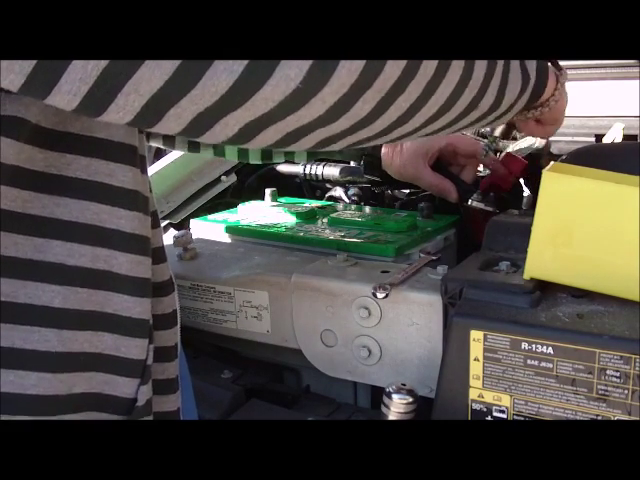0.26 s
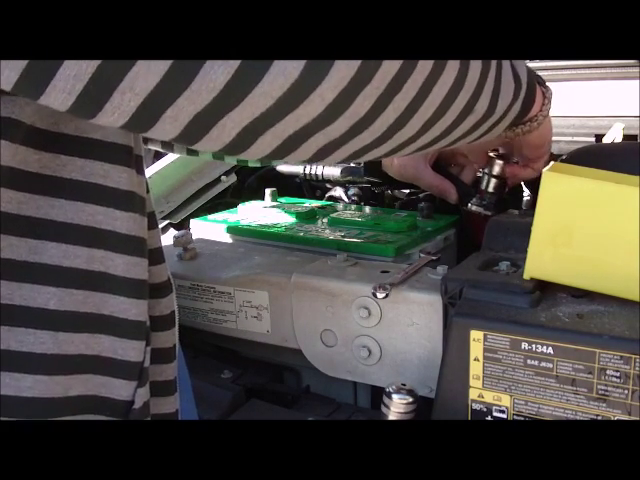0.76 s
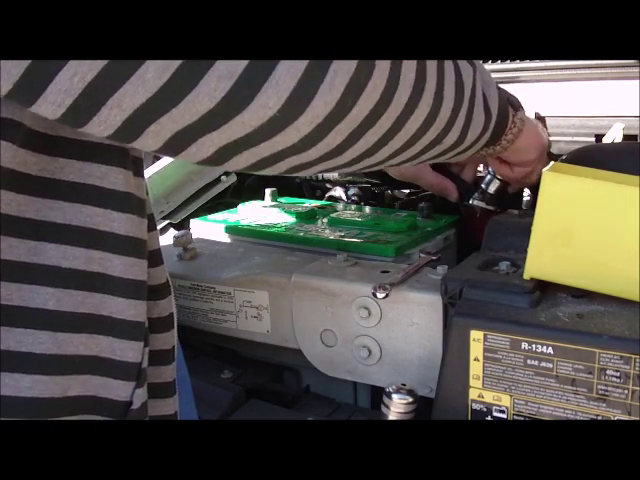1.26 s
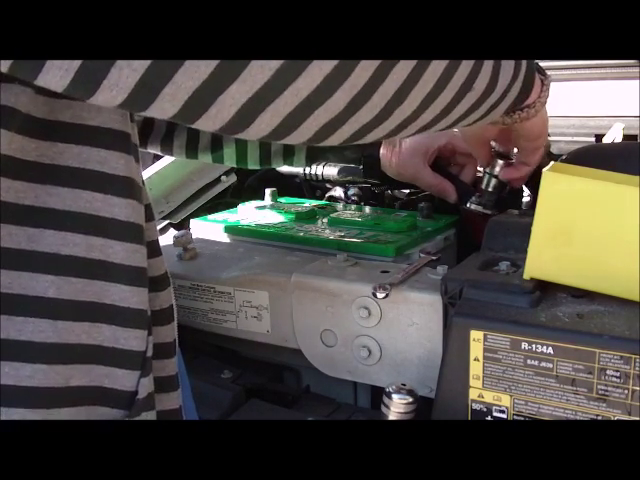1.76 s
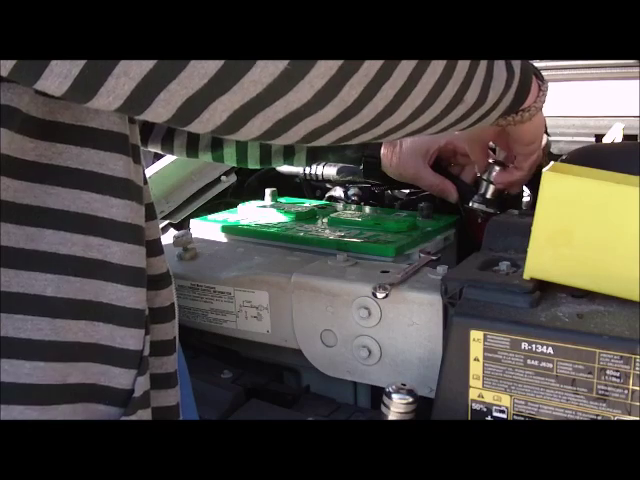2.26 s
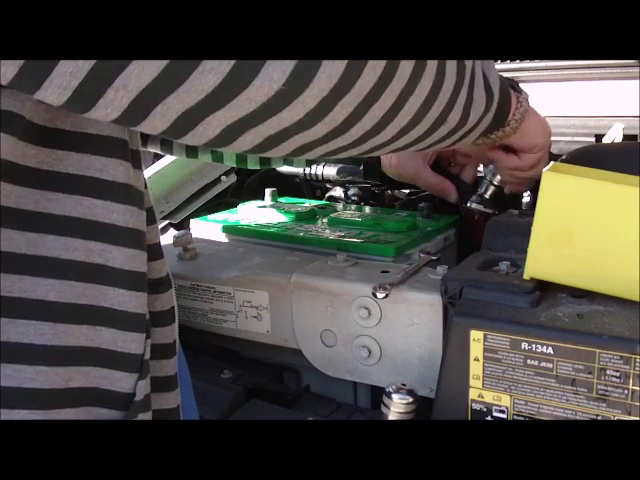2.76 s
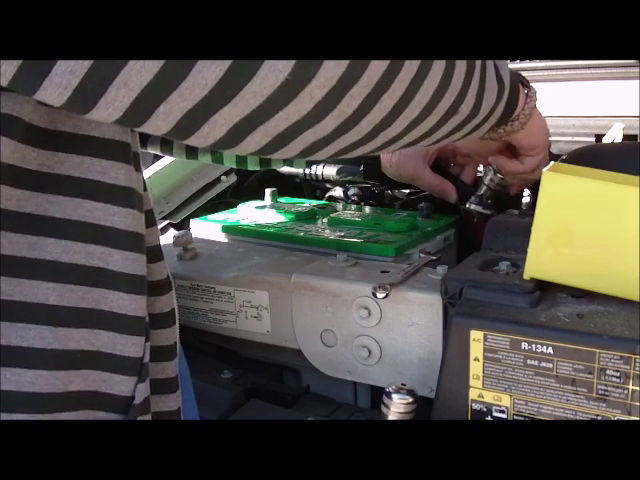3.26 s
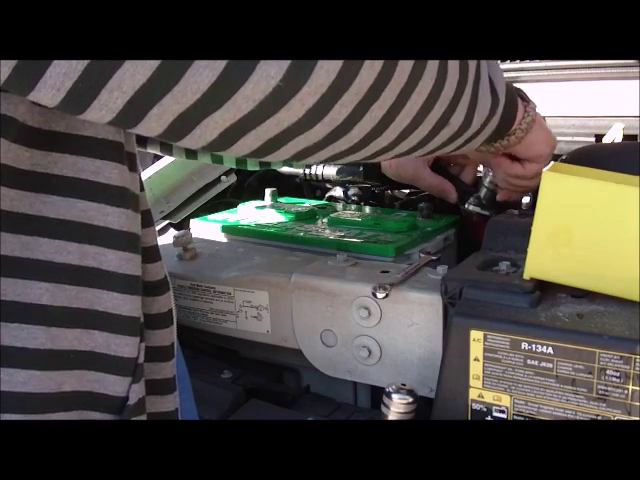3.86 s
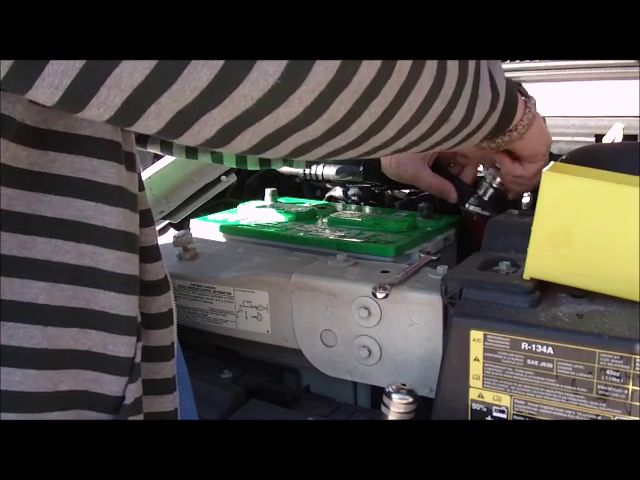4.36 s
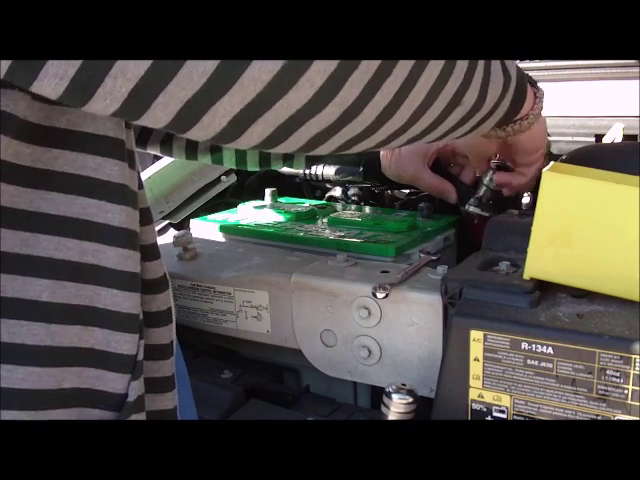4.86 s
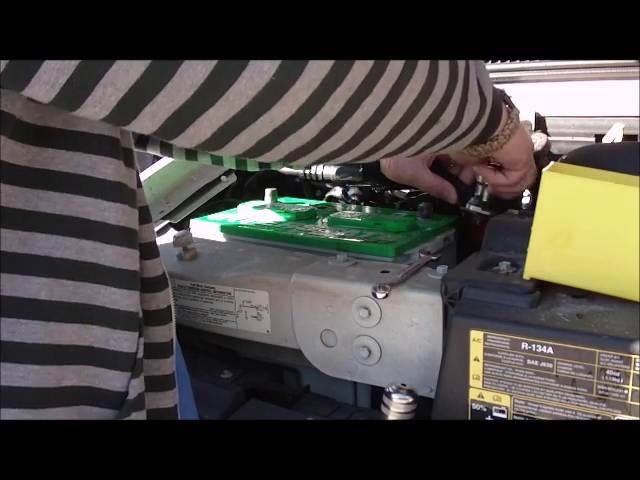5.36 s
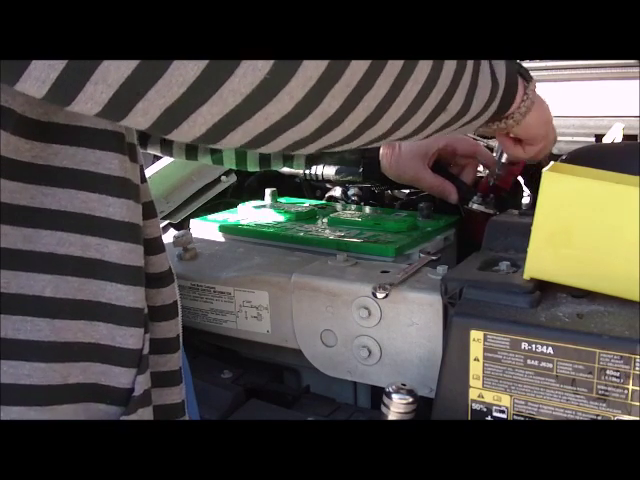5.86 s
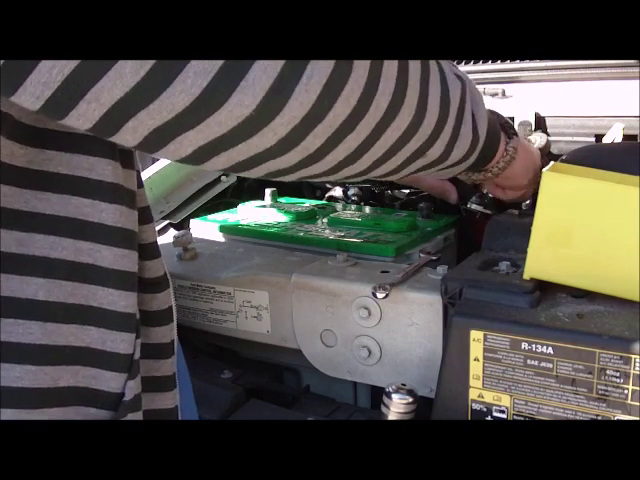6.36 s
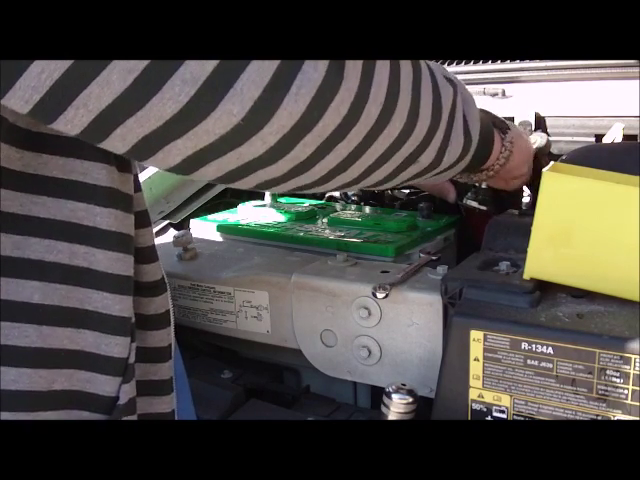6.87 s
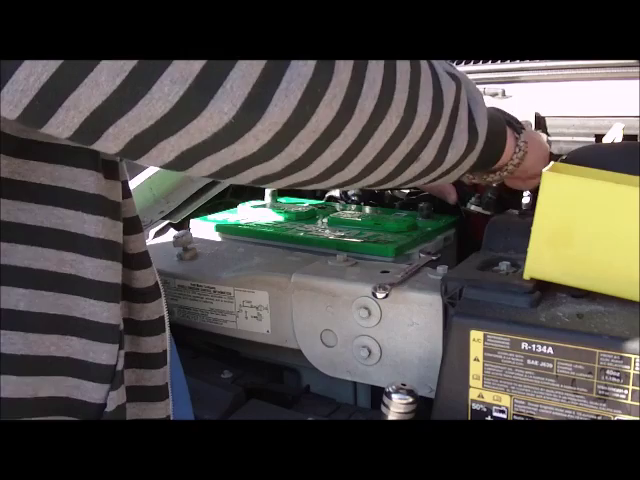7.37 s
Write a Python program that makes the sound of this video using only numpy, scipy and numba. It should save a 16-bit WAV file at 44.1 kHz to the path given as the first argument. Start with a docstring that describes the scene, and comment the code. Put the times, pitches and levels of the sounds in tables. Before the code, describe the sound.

In an open garage, a cup-shaped wire brush is worked by hand on a battery terminal, heard close and nearly mono. Quick gritty scratches open the first 0.25 seconds, then a near pause until 0.65. At 0.9 a sharp steel clack rings, the loudest knock, followed by raspy twists and smaller metallic ticks from 1.4 to 2.0. Uneven strokes continue, with a longer scrape at 2.5 and a softer one at 3.1. The firmest, brightest grinding comes from 3.7 to 5.1, full of crackling bristle catches, with a short hard rasp at 5.6. After a brief gap, lighter, hollower strokes run from 6.0 to 7.0. Another lull ends with a scrape and high clink near 7.45. A wavering low hum and distant traffic rumble lie beneath, and a faint hollow howl swells at the end.

```python
"""In an open garage, a cup-shaped wire brush is twisted to and fro on a battery terminal.
Bristles slip over the metal in clumps of tiny clicks; they ring the steel shell and the air in the cup,
whose pitch rises as the cup lifts. Steel knocks crack and ring, and nearby metal throws back short echoes.
A wavering mains hum and far traffic lie below, and a hollow howl swells at the end."""
import sys
import numpy as np
from scipy import signal
from scipy.fft import rfft, irfft
from scipy.io import wavfile
from numba import njit

SR = 44100
rng = np.random.default_rng(int(sys.argv[2]) if len(sys.argv) > 2 else 0)


def gain_from_db(level_db):
    """Turn a decibel level (scalar or array-like) into a linear amplitude factor."""
    decades = np.asarray(level_db, float) / 20
    return 10 ** decades


def unload_wav(signal):
    """Save mono or channel-first audio to the path in sys.argv[1] as 16-bit WAV at rate SR, clipped to [-1, 1]."""
    wavfile.write(
        sys.argv[1],
        SR,
        np.round(np.clip(np.atleast_2d(signal).T, -1, 1) * 32767).astype(np.int16),
    )


N = 335601  # length in samples


def rms_one(x):
    """Scale to rms 1."""
    return x / np.sqrt(np.mean(x ** 2) + 1e-20)


def in_time(rows):
    """Draw straight lines between the rows of a table: each column gets one value a sample."""
    seconds, *columns = np.transpose(rows)
    return [np.interp(np.arange(N) / SR, seconds, column) for column in columns]


def colour(x, spectrum):
    """Shape by a spectrum; white noise of rms 1 keeps about rms 1."""
    hz, db = np.transpose(spectrum)
    grid = np.arange(N // 2 + 1) * SR / N + 1   # the 1 keeps the logarithm finite
    gain = gain_from_db(np.interp(np.log(grid), np.log(hz), db, left=-90, right=-90))
    return irfft(rfft(x) * rms_one(gain), N)


def drift(rate_hz):
    """Slow random wandering of spread 1: noise through two equal low-pass filters."""
    r = np.exp(-2 * np.pi * rate_hz / SR)
    white = rng.standard_normal(N + SR)
    settled = signal.lfilter([1], [1, -2 * r, r * r], white)[SR:]
    return rms_one(settled)


def resonate(x, modes):
    """Resonances (Hz, width Hz, dB) side by side, with alternating signs."""
    out = 0
    for k, (hz, width_hz, db) in enumerate(modes):
        r = np.exp(-np.pi * width_hz / SR)
        top = gain_from_db(db) * (-1) ** k * (1 - r * r) / 2
        out = out + signal.lfilter([top, 0, -top], [1, -2 * r * np.cos(2 * np.pi * hz / SR), r * r], x)
    return out


@njit
def gliding(x, twice_cos, r):
    """A resonance whose centre moves."""
    y = np.zeros_like(x)
    for i in range(2, len(x)):
        y[i] = (1 - r * r) / 2 * (x[i] - x[i - 2]) + r * twice_cos[i] * y[i - 1] - r * r * y[i - 2]
    return y


def bursts(events, offset_db, t60):
    """A click, then noise that dies away by 60 dB in t60 seconds."""
    seconds, peak_db = np.transpose(events)
    hits = np.full(N, 1e-18)
    hits[np.round(seconds * SR).astype(int)] = gain_from_db(peak_db + offset_db)
    fade = signal.lfilter([1], [1, -gain_from_db(-60 / (t60 * SR))], hits)
    return 0.39 * hits + fade * rng.standard_normal(N)


# The street. Each row: time in seconds, rumble in relative dB, tyre roar in relative dB.
STREET_LEVELS = [(0, -45.5, -58.5), (.6, -48.5, -61), (.75, -44.5, -53.5), (2.25, -46.5, -62.5),
                 (2.5, -44, -55.5), (3.3, -46, -58), (4.35, -41, -49), (6.05, -45, -56.5), (6.4, -43, -50),
                 (7.2, -44, -55), (7.5, -39, -47.5)]
# Tone colour of the rumble. Each row: frequency in Hz, strength in relative dB per Hz.
RUMBLE_COLOUR = [(18, -33), (30, 1), (46, 0), (76, 1.5), (95, -4.5), (150, -8), (190, -19), (260, -23)]
# Tone colour of the tyre roar. Each row: frequency in Hz, strength in relative dB per Hz.
ROAR_COLOUR = [(100, 3.5), (500, -4.5), (1000, -8.5), (2000, -14.5), (3500, -24), (15800, -30.5)]
# Loudness of the mains hum. Each row: time in seconds, level in relative dB.
HUM_LEVELS = [(0, -59), (1.2, -49), (2.5, -53.5), (4.3, -47.5), (6.3, -51), (6.5, -45), (7.61, -48.5)]
# The hollow howl that swells at the end. Each row: time in seconds, level in dB.
HOWL_LEVELS = [(7.15, -76.5), (7.42, -42.5), (7.61, -48.5)]


def garage():
    """Coloured noise for rumble and roar, a wavering hum with its octave, and ringing noise for the howl."""
    rumble_db, roar_db = in_time(STREET_LEVELS)
    rumble = gain_from_db(rumble_db) * colour(rng.standard_normal(N), RUMBLE_COLOUR)
    roar = gain_from_db(roar_db + 4.0) * colour(rng.standard_normal(N), ROAR_COLOUR)
    hum_hz = 120 + 1.296 * drift(2.0)
    phase = 2 * np.pi * np.cumsum(hum_hz) / SR
    hum_db = in_time(HUM_LEVELS)[0] + 3.5 + 1.26 * drift(15.0)
    hum = gain_from_db(hum_db) * (np.sin(phase) + gain_from_db(-20.0) * np.sin(2 * phase))
    hollow = rms_one(resonate(rng.standard_normal(N), [(483, 47, 0)]))
    howl = gain_from_db(in_time(HOWL_LEVELS)[0]) * hollow
    return rumble + roar + hum + howl


def engine_bay(x):
    """Dense short reflections from the metal around the battery."""
    t = np.arange(SR // 5) / SR
    # the first reflection comes after 3 ms; they fall at 60 dB per 20 ms
    echo = rng.standard_normal(len(t)) * gain_from_db(-60 * t / 0.02) * (t > .003)
    return gain_from_db(-5.5) * signal.fftconvolve(x, echo / np.sqrt(np.sum(echo ** 2)))[:N]


# Steel knocks on the terminal.
# Each row: time in seconds, peak in relative dB, pitch at which the knock rings in Hz.
KNOCK_EVENTS = [(0.283, -50, 3000), (0.631, -36, 3110), (0.893, -16.5, 2310), (0.9101, -3.5, 1390),
                (0.958, -23.5, 1700), (1.446, -21, 1930), (1.549, -25.5, 3100), (1.598, -32, 3040),
                (1.741, -45, 2700), (1.768, -32.5, 2740), (1.994, -28, 1680), (3.076, -42, 2320),
                (4.134, -30, 2700), (4.211, -31, 2650), (6, -34, 3320), (6.107, -33, 2580),
                (6.412, -46, 3760), (7.429, -25.5, 3120), (7.456, -18, 3560)]


def knocks():
    """Each knock is a short crack and a ring at its own pitch."""
    crack = bursts([row[:2] for row in KNOCK_EVENTS], -7.5, 0.015)
    out = signal.sosfilt(signal.butter(2, [1200, 8000], "band", fs=SR, output="sos"), crack)
    for seconds, peak_db, hz in KNOCK_EVENTS:
        first = round(seconds * SR)
        own = slice(first, first + SR // 8)
        kick = .5 * crack[own]
        kick[0] = gain_from_db(peak_db + 8)   # the blow itself
        ring_db = 22 - 0.6 * (peak_db + 33.0)   # harder knocks are more crack, less ring
        out[own] += resonate(kick, [(hz, 110., ring_db)])
    return out


# Twists of the wrist. Each row: start in seconds, length in seconds, share of the length
# at which it bears hardest (0-1), bristles in relative dB, air in the cup in relative dB.
TWISTS = [(0.001, 0.04, 0.4, -31, -49), (0.057, 0.064, 0.25, -33.5, -54), (0.141, 0.013, 0, -44, -59),
          (0.168, 0.046, 0.17, -29, -30.5), (0.251, 0.047, 0.6, -66, -49), (0.64, 0.017, 0, -44, -55),
          (0.712, 0.019, 0.13, -29, -35.5), (0.755, 0.056, 1, -34.5, -55), (0.876, 0.13, 0.2, -33, -65),
          (0.929, 0.14, 0.03, -34.5, -44), (1.14, 0.26, 0.08, -34.5, -49.5),
          (1.382, 0.16, 0.32, -28.5, -44), (1.544, 0.075, 0.73, -64, -46),
          (1.687, 0.028, 0.5, -46.5, -44.5), (1.733, 0.061, 1, -45.5, -40.5), (1.813, 0.02, 0.6, -36, -43),
          (1.878, 0.16, 0.27, -34, -50), (2.141, 0.21, 0.46, -31.5, -53.5), (2.379, 0.058, 0.4, -37, -52.5),
          (2.472, 0.094, 0.05, -33.5, -48.5), (2.509, 0.314, 0.14, -27.5, -51),
          (2.84, 0.12, 0.64, -44, -71), (3.074, 0.34, 0.61, -30, -45.5), (3.444, 0.087, 0.7, -41.5, -50.5),
          (3.702, 0.25, 0.08, -24, -42), (4.018, 0.073, 0, -39, -50), (4.117, 0.021, 0.9, -30.5, -57),
          (4.212, .33, 0.65, -22, -40.5), (4.547, 0.14, 0.25, -42.5, -48), (4.762, 0.045, 0.06, -36.5, -44),
          (4.819, 0.3, 0.16, -20, -37.5), (5.17, 0.083, 0.2, -35.5, -45.5), (5.227, 0.05, 0.96, -27.5, -58),
          (5.294, 0.29, 0, -41.5, -53), (5.509, 0.096, 0.44, -37.5, -59), (5.586, 0.047, 0.33, -20, -27),
          (6, 0.055, 0, -44, -71), (6.085, 0.048, 0.06, -38.5, -61), (6.174, 0.13, 0.6, -28.5, -40.5),
          (6.348, 0.04, 0.26, -33.5, -51.5), (6.442, 0.12, 0.38, -40, -53), (6.537, 0.15, 0.82, -28, -43.5),
          (6.721, 0.18, 0.82, -35.5, -53.5), (6.935, 0.088, 0.6, -28.5, -29), (7.409, 0.046, 0, -41, -53),
          (7.462, 0.1, 0, -25.5, -33)]
# Spans without light rubbing between the twists. Each row: from seconds, to seconds.
NO_LIGHT_RUB = [(.3, 0.67), (2.97, 3.36), (5.67, 6.0), (7.04, 7.4)]
BITE_DB_PER_S, LET_GO_DB_PER_S = 3994, 905   # how fast a twist sets in and stops


def effort(top_db, arch_db, lag, resting_db):
    """Each twist bites, swells to its top, sags and lets go; between most twists the wires rub lightly."""
    t = np.arange(N) / SR
    out = np.full(N, float(resting_db))
    for start, end in NO_LIGHT_RUB:
        out[(t > start) & (t < end)] = -88   # next to nothing under the twists
    start_below, end_below = arch_db
    below = [-60 - start_below, -start_below, 0, -end_below, -60 - end_below]
    for (start, length, share, *_), db in zip(TWISTS, top_db):
        share = np.clip(share + lag * (1 - share), .02, .98)
        end = start + length
        times = [start - 60 / BITE_DB_PER_S, start, start + share * length, end, end + 60 / LET_GO_DB_PER_S]
        own = slice(max(int(times[0] * SR), 0), int(times[-1] * SR))
        out[own] = np.maximum(out[own], db + np.interp(t[own], times, below))
    return out


def judder():
    """The whole brush sticks and jumps: each jump is loud at once and fades in some ms."""
    jumps = (rng.random(N) < 110 / SR) * rng.random(N)
    return .55 + signal.lfilter([1], [1, -np.exp(-1 / (.003 * SR))], jumps)


def slips(per_s, spread_db, clump_db, smooth):
    """Wire tips slip at random, in clumps, each buzzing on for a few ms; scaled to rms 1."""
    sizes = gain_from_db(spread_db * np.minimum(rng.exponential(1, N), 4))
    born = rng.random(N) < per_s * gain_from_db(clump_db * drift(45)) / SR
    r = np.exp(-1 / (0.0014 * SR))
    # dividing by the rate keeps the loudness even however many wires slip
    buzz = signal.lfilter([1 - r], [1, -r], sizes * born) * SR / (per_s * sizes.mean())
    return rms_one(rng.standard_normal(N) * (smooth + buzz) * judder())


# Bristles catch and let go at once. Each row: time in seconds, peak in relative dB.
CATCH_EVENTS = [(0.0605, -23), (0.1694, -17), (0.631, -27), (0.7126, -19), (0.8931, -25), (0.9107, -6),
                (1.5705, -21.5), (1.5958, -21.5), (1.6184, -25.5), (1.7395, -30), (1.7675, -19),
                (2.0793, -25.5), (2.8253, -11.5), (2.9457, -25.5), (3.6, -25), (3.6566, -26.5),
                (3.6935, -19), (4.0268, -27), (4.1226, -26), (4.2339, -15), (4.293, -8), (4.3545, -14),
                (4.422, -7), (4.5093, -11.5), (4.5821, -20), (4.7142, -21), (4.937, -7), (5.6474, -27),
                (6.1065, -18), (6.1722, -29), (6.2922, -17), (6.4114, -22), (6.5381, -24), (6.675, -11),
                (6.7926, -28.5), (6.833, -14)]


def rubbing():
    """Slipping wires, alone and as a force that follows the twists, with the catches added."""
    bristle_db = np.transpose(TWISTS)[3]
    stroke_db = effort(bristle_db, arch_db=(6, 10), lag=0, resting_db=-55.5)
    per_s = 250 * gain_from_db(0.87 * np.clip(stroke_db + 49.5, 0, 25))   # a firm stroke engages more wires
    rub = slips(per_s, spread_db=4.5, clump_db=1.5, smooth=0.45)
    force = gain_from_db(stroke_db - 6.0) * rub + bursts(CATCH_EVENTS, -9, 0.0084)
    return rub, force


def patchy(x, depth_db):
    """Different wires bear at each moment: above 4500 Hz every third of an octave swells on its own."""
    edges = 4500 * 2 ** (np.arange(7) / 3)
    out = signal.sosfilt(signal.butter(2, edges[0], fs=SR, output="sos"), x)
    for k, band in enumerate(zip(edges, edges[1:])):
        part = signal.sosfilt(signal.butter(2, band, "band", fs=SR, output="sos"), x)
        sign = -(-1) ** k
        out += part * sign * gain_from_db(depth_db * drift(12.))
    return out


def wire_pings(force, count):
    """Single wires sing for a moment, each at a pitch of its own."""
    pitches = np.geomspace(5600, 14800, count) * rng.uniform(.98, 1.02, count)
    out = 0
    for hz in pitches:
        own_force = force * gain_from_db(5.0 * drift(47.0)) * rng.choice([-1, 1], N)
        out = out + resonate(own_force, [(hz, 150., 0)])
    return out


# Bristles of the seated tool. Each row: frequency in Hz, strength in relative dB per Hz.
SEATED_COLOUR = [(900, -10), (3000, -4.5), (4500, -12.5), (6000, -1.5), (8200, -3), (11000, 4.5),
                 (13000, -3.5), (15800, -9)]
# Bristles of the lifted tool. Each row: frequency in Hz, strength in relative dB per Hz.
LIFTED_COLOUR = [(900, -8), (3000, -4.5), (4500, -16), (5500, -1.5), (7600, -3), (10500, 2.5), (13000, -2),
                 (15800, -8)]


def wires(force, depth):
    """The force rasps and pings the wires; their colour blends from lifted to seated with depth."""
    rasp = gain_from_db(-4.0) * patchy(force, depth_db=3.5) + gain_from_db(-0.5) * wire_pings(force, count=22)
    return depth * colour(rasp, SEATED_COLOUR) + (1 - depth) * colour(rasp, LIFTED_COLOUR)


# Ring of the steel shell. Each row: frequency in Hz, width in Hz, level in relative dB.
SHELL_MODES = [(6448, 243, 8.5), (6060, 640, 2.5), (7330, 62, 5.5)]


def shell(force, depth):
    """The force rings the steel shell, more strongly the deeper the tool sits."""
    broad = resonate(force, [(6580, 920, 0)])   # gives the ring steep flanks
    return depth ** 1.4 * gain_from_db(13.5 + 2.72 * drift(21.6)) * resonate(broad, SHELL_MODES)


# Pitch of the air in the cup before it wobbles. Each row: time in seconds, frequency in Hz.
CUP_GLIDE = [(0, 1850), (.19, 1900), (.215, 2800), (.62, 3050), (.8, 2560), (.93, 1730), (1.2, 1740),
             (1.47, 1940), (1.49, 2580), (1.57, 2780), (1.77, 2670), (2.0, 1750), (2.48, 1950),
             (2.82, 1440), (3.07, 2250), (3.4, 1530), (3.51, 2110), (3.72, 1650), (3.9, 1380), (4.13, 2430),
             (4.3, 1970), (4.39, 1470), (4.62, 1940), (4.8, 1900), (4.93, 1610), (5.13, 1480), (5.25, 2120),
             (5.55, 2000), (5.595, 1426), (5.615, 2730), (6.17, 2690), (6.27, 2270), (6.58, 2330),
             (6.95, 2260), (7.01, 2720), (7.46, 3450), (7.5, 2480), (7.61, 2010)]


def cup_air(rub):
    """Rubbing and noise excite the air in the cup, a gliding resonance, and a rasp of the steel."""
    air_db = np.transpose(TWISTS)[4]
    # the air tops later, by 0.15 of what is left of the twist
    cup_db = effort(air_db, arch_db=(9, 8), lag=0.15, resting_db=-63)
    cup_hz = in_time(CUP_GLIDE)[0] * (1 + .035 * drift(30.))   # the tool rocks
    twice_cos = 2 * np.cos(2 * np.pi * cup_hz / SR)
    r = np.exp(-np.pi * 400 / SR)   # each pass is 400 Hz wide
    grind = (rub + rng.standard_normal(N)) * gain_from_db(cup_db + 9.0 + 3.15 * drift(24.7))
    broad = gliding(grind, twice_cos, r)
    air = gliding(broad, twice_cos, r) + gain_from_db(-9) * broad
    return air + resonate(grind, [(2600, 2000, -17)])   # the steel also rasps across the middle


# Steel modes of the tool. Each row: frequency in Hz, width in Hz, level in relative dB.
TOOL_MODES = [(1448, 34, 13.5), (2395, 22.5, 1), (1900, 32, 5.5), (2074, 20.5, 5), (1598, 27, 7),
              (2730, 60, 2), (3110, 15, 10), (3610, 15, -1.5)]


def tool_steel(struck, blows):
    """Grinding and knocks ring the steel of the tool; each mode comes and goes on its own."""
    drive = struck + .5 * blows
    return sum(resonate(drive * gain_from_db(3.5 * drift(14.)), [mode]) for mode in TOOL_MODES)


# How deep the tool sits. Each row: time in seconds, depth from 0 to 1.
TOOL_DEPTH = [(0, 0.88), (.3, 0.53), (.9, 0.74), (1.5, 0.48), (2.2, 0.89), (3.5, 0.77), (5.2, 0.9),
              (5.6, 0.55), (6.1, 0.46), (7.61, 0)]


def brush():
    """The rubbing force drives the wires and the shell; the cup's air sounds over the steel modes."""
    depth = np.clip(in_time(TOOL_DEPTH)[0], 0, 1)
    rub, force = rubbing()
    struck = cup_air(rub)
    blows = knocks()
    bristles = wires(force, depth) + shell(force, depth)
    return bristles + gain_from_db(-1.5) * struck + tool_steel(struck, blows) + blows


def scene():
    """Nearly mono: the channels differ only by a faint, dull noise."""
    tool = brush()
    dull = [(40, 0), (200, -20), (900, -37), (1500, -45), (15000, -55)]   # Hz, relative dB per Hz
    side = gain_from_db(-74.0) * colour(rng.standard_normal(N), dull)
    return tool + engine_bay(tool) + garage() + side * [[1], [-1]]


def low_pass(x):
    """Removes everything above the highest recorded frequency."""
    return signal.sosfilt(signal.butter(12, 16500, fs=SR, output="sos"), x)


def record(dry):
    """The top of the treble is cut, steeply from 15.3 kHz up."""
    hz = np.arange(N // 2 + 1) * SR / N
    cut_db = np.interp(hz, [15240, 15300, 15900, 16400], [0, -16, -36, -70])
    mix = irfft(rfft(dry) * gain_from_db(cut_db), N)
    return low_pass(mix)


dry = scene()
out = record(dry)
unload_wav(out)
```